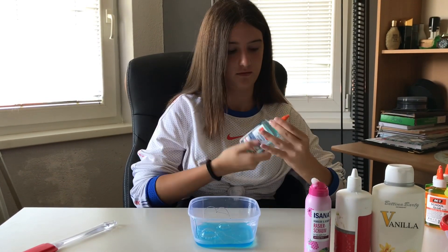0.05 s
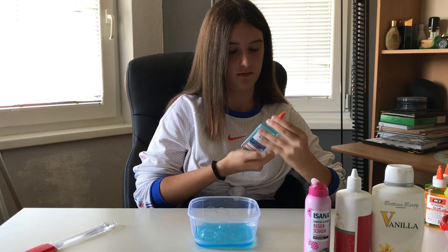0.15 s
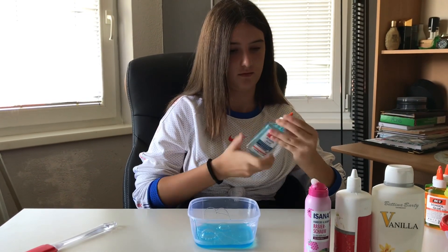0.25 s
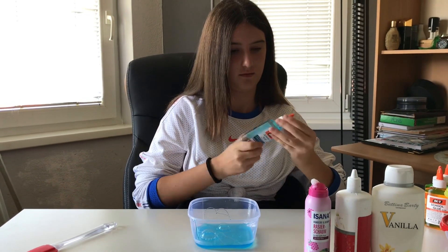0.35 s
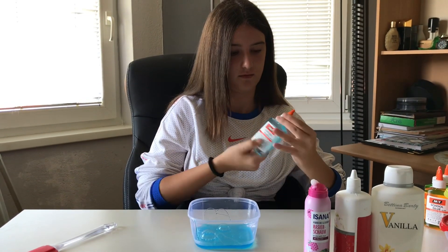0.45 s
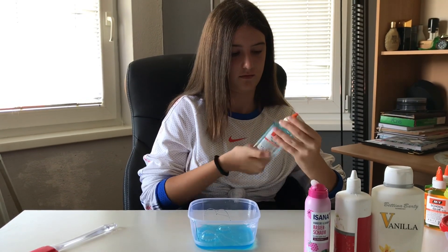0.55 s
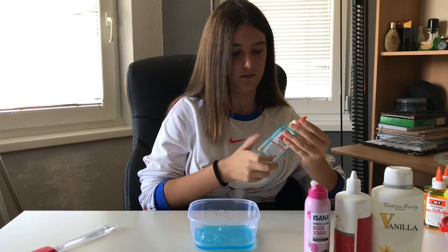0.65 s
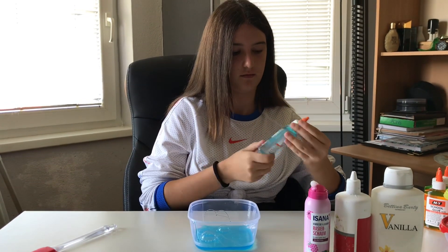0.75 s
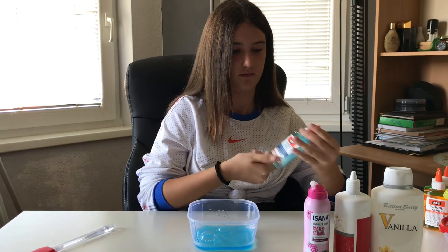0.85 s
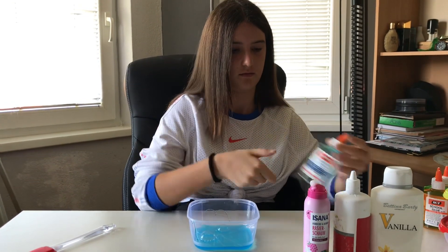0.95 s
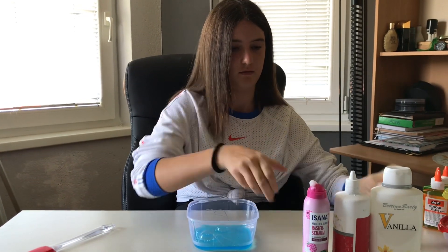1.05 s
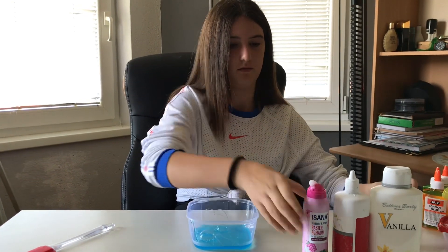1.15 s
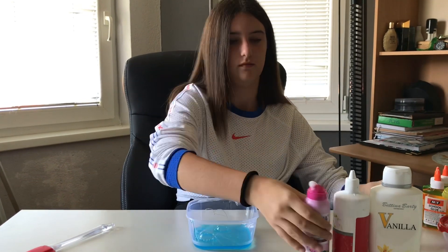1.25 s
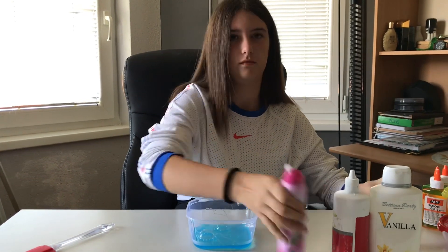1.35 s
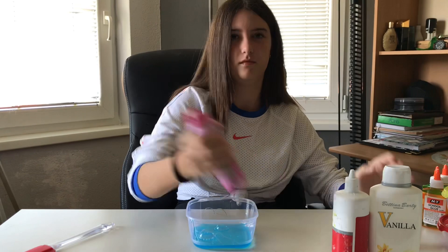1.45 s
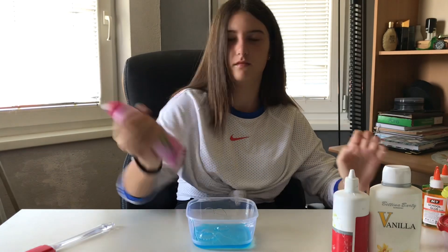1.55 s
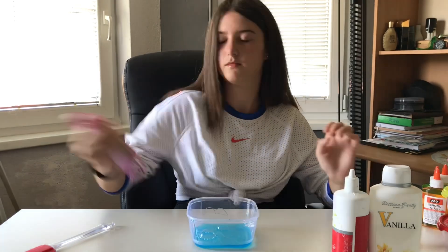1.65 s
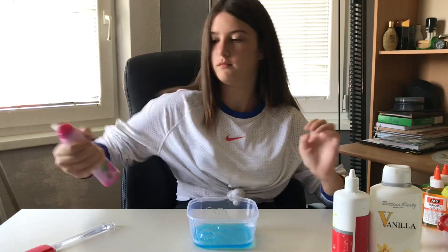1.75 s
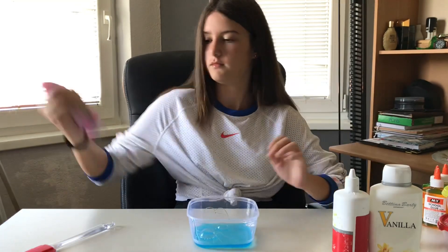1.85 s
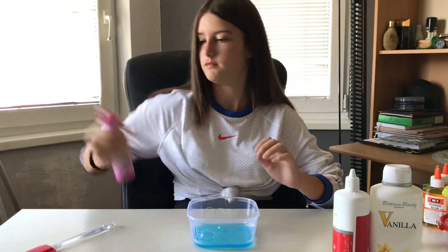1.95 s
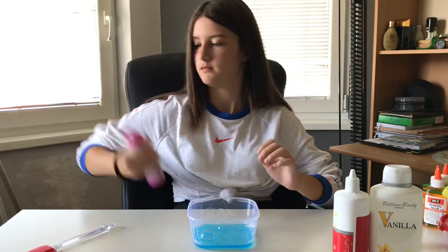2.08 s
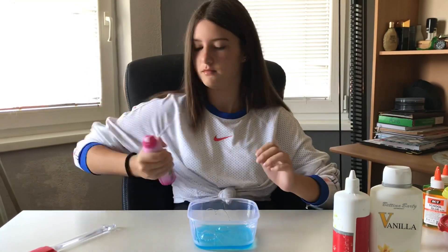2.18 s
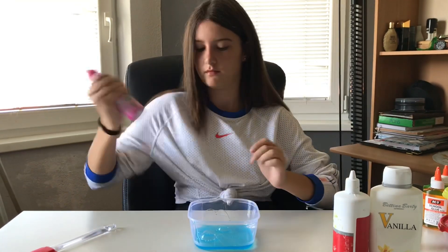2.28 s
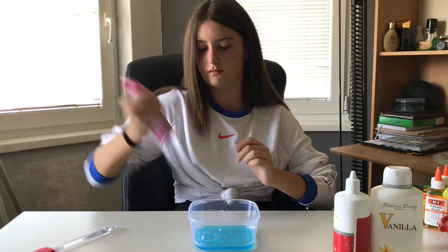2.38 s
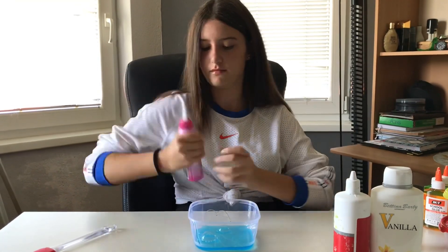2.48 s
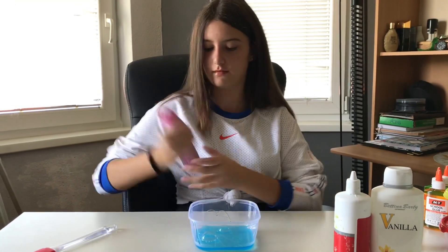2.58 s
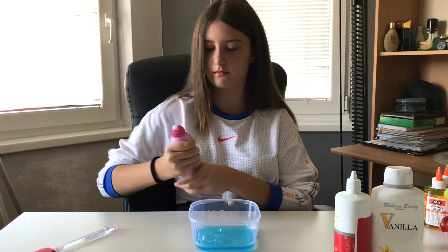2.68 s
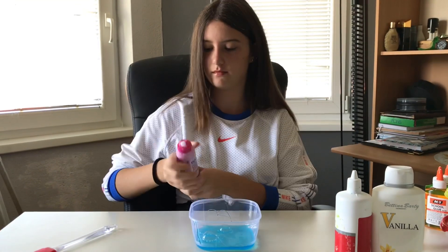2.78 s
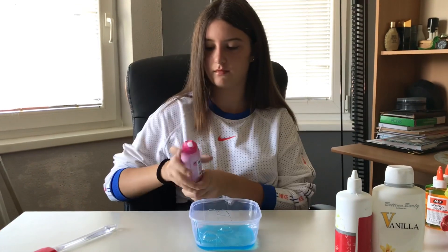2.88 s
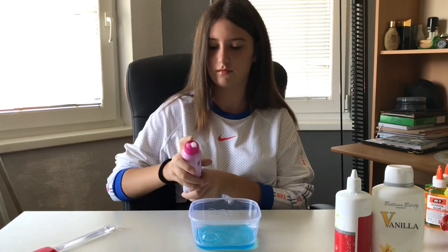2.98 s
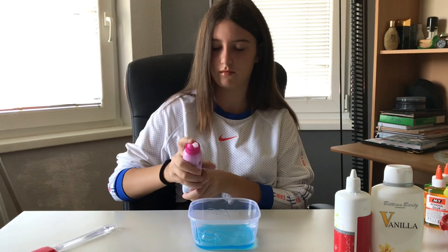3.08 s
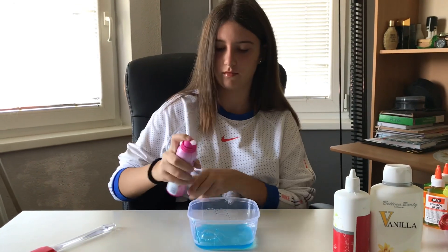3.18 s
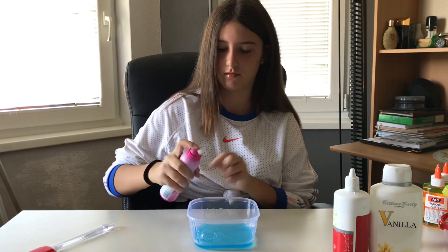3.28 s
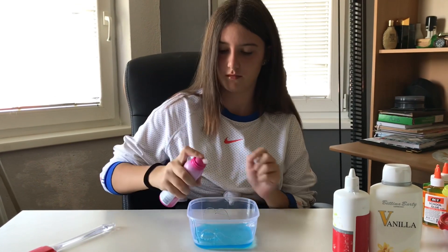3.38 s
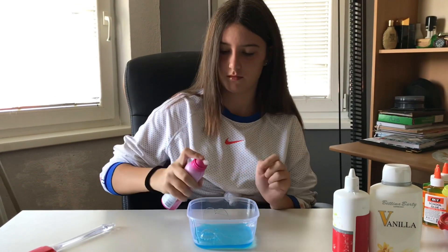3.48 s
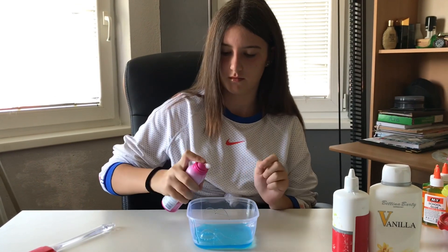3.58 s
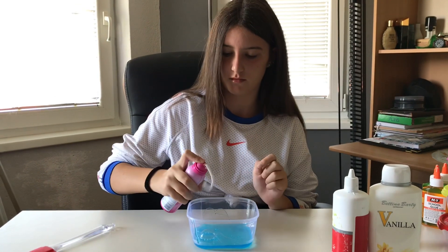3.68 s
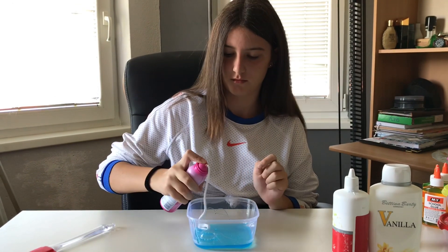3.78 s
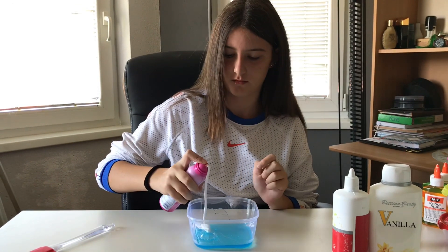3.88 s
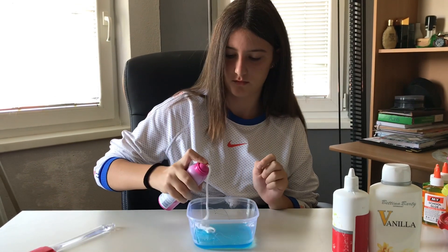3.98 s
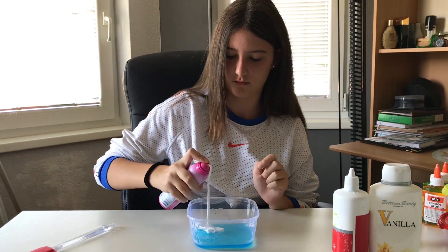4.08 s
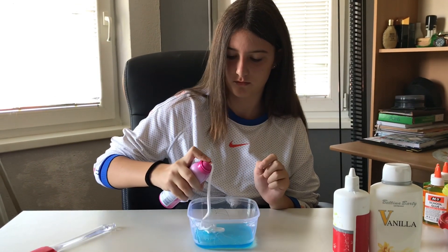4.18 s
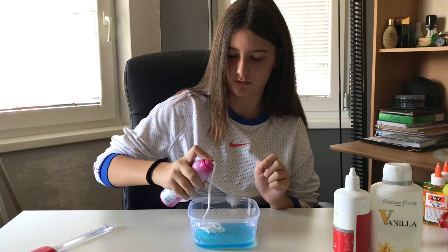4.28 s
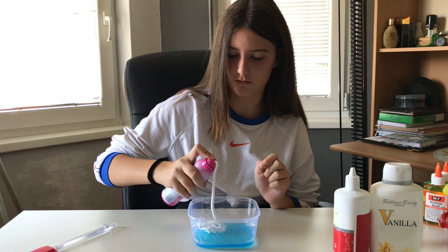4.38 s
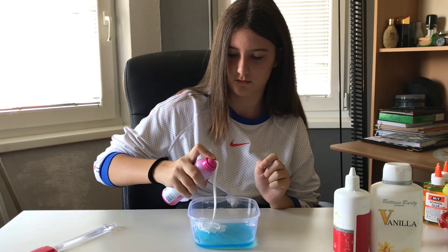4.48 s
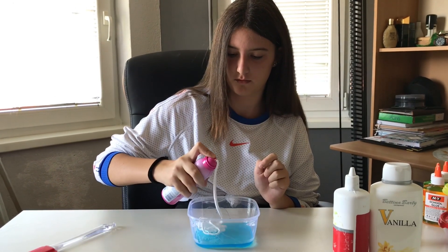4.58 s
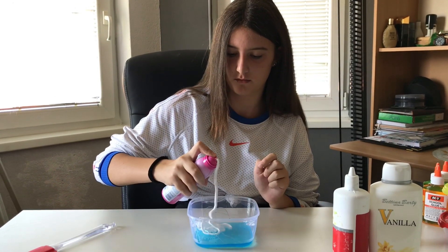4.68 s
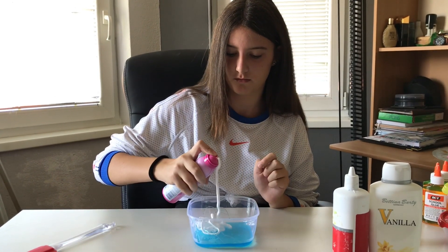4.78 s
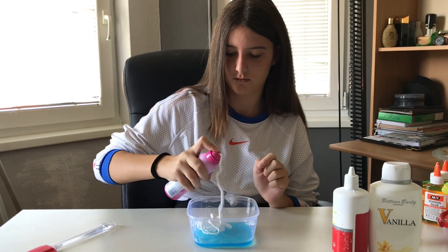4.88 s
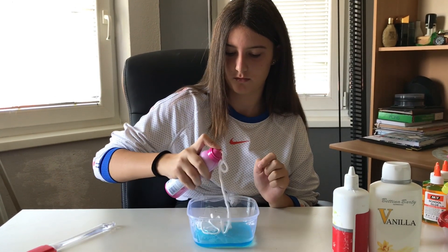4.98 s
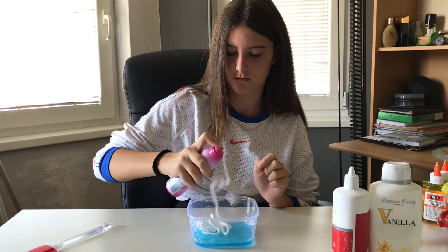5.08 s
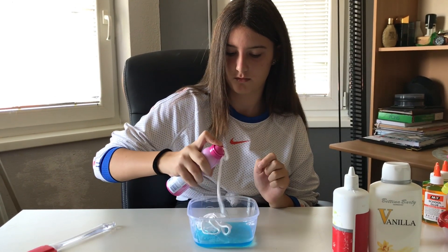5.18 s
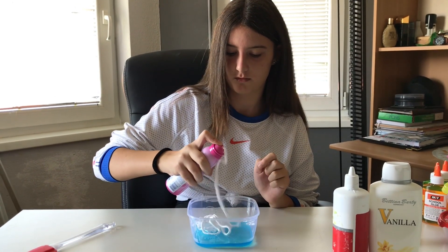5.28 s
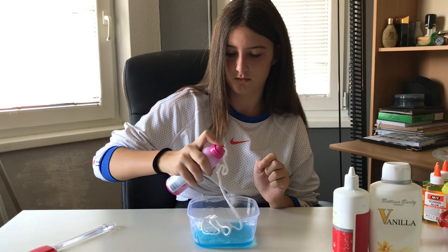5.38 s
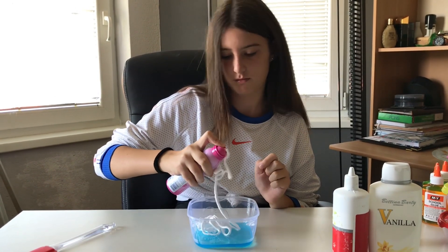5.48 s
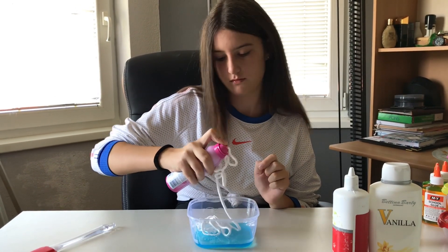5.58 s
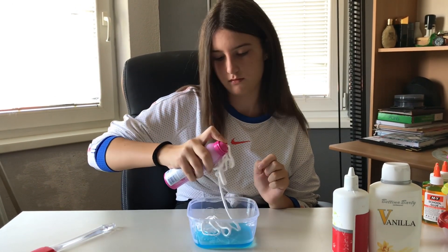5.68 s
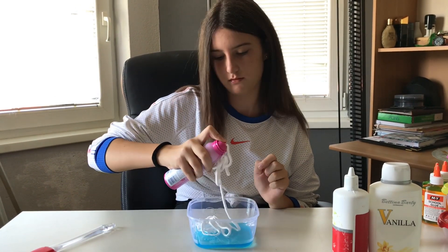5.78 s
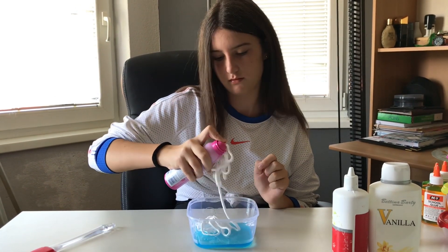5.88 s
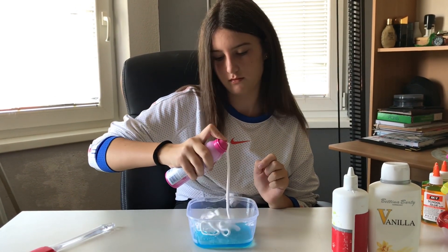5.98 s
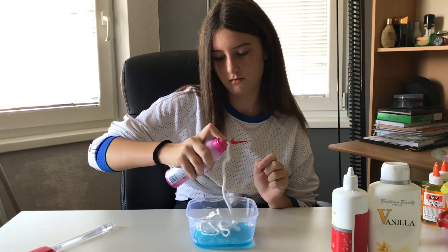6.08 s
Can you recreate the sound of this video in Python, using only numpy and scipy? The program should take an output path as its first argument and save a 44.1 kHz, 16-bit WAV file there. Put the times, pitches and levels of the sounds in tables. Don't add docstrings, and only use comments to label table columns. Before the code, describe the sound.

A plastic bottle drops and clatters on a desk, a hard knock follows, a can is shaken with liquid slaps, then foam hisses softly.

```python
import sys
import numpy as np
from scipy import signal
from scipy.fft import rfft, irfft, next_fast_len
from scipy.io import wavfile
from scipy.ndimage import uniform_filter1d

SR = 44100
rng = np.random.default_rng(int(sys.argv[2]) if len(sys.argv) > 2 else 0)


def waveform_to_disk(signal):
    frames = np.transpose(np.atleast_2d(signal))
    scaled = np.clip(frames, -1, 1) * 32767
    samples = np.round(scaled).astype(np.int16)
    wavfile.write(sys.argv[1], SR, samples)


def ratio_of_db(decibels):
    return 10 ** (np.asarray(decibels, float) / 20)


N = 270774
TIME = np.arange(N) / SR


def evened(x):
    return x / np.sqrt(np.mean(x ** 2) + 1e-20)


def read(points, hz):
    f, value = np.transpose(points)
    return np.interp(np.log(hz + 1), np.log(f + 1), value)


def add(mix, s, sound):
    part = mix[round(s * SR):][:len(sound)]
    part += sound[:len(part)]


def curve(rows, fade=0.014):
    rows = np.array(rows)
    start, end = rows[0, 0], rows[-1, 0]
    inside = np.clip(np.minimum(TIME - start + fade, end + fade - TIME) / fade, 0, 1)
    return ratio_of_db(np.interp(TIME, rows[:, 0], rows[:, 1])) * inside


def gesture(start, db, rise, hold, t60):
    t = TIME - start
    return np.clip(t / rise, 0, 1) * ratio_of_db(db - 60 * np.maximum(t - rise - hold, 0) / t60)


def swells(rows, base_db=-200):
    power = sum(ratio_of_db(2 * db) * np.exp(-((TIME - s) / length) ** 2) for s, db, length in rows)
    return np.sqrt(ratio_of_db(2 * base_db) + power)


def noise(spectrum, patchy_db, flicker_db, size=256):
    frames, hz = 4 * N // size + 8, np.fft.rfftfreq(size, 1 / SR)
    a, b, patches = rng.standard_normal((frames, len(hz), 3)).T
    patches = uniform_filter1d(patches, size // 64, 0)
    patches = evened(uniform_filter1d(patches, 8192 // size, 1))
    flicker = evened(uniform_filter1d(rng.standard_normal(frames), size=4))
    level_db = read(spectrum, hz)[:, None] + patchy_db * patches + flicker_db * flicker
    z = (a + 1j * b) * ratio_of_db(level_db)
    return evened(signal.istft(z, nperseg=size, noverlap=3 * size // 4)[1][:N])


def drone(hz, wander_hz):
    drift = uniform_filter1d(rng.standard_normal(N), size=3000)
    drift = evened(uniform_filter1d(drift, size=3000))
    return np.sqrt(2) * np.sin(2 * np.pi * np.cumsum(hz + wander_hz * drift) / SR)


def resonate(x, hz, width):
    turn = np.exp(2j * np.pi * np.cumsum(hz * np.ones(len(x))) / SR)
    r = np.exp(-np.pi * width / SR)
    return 2 * (turn * signal.lfilter([(1 - r) ** 2], [1, -2 * r, r * r], x / turn)).real


def resonances(peaks):
    size = next_fast_len(N)
    f = np.fft.rfftfreq(size, 1 / SR)
    shape = sum(ratio_of_db(db) / np.sqrt(width) / (1 + (2 * (f - hz) / width) ** 2) for hz, width, db in peaks)
    return evened(irfft(rfft(rng.standard_normal(size)) * shape, size)[:N])


def click(spectrum):
    level_db = read(spectrum, abs(np.fft.fftfreq(4096, 1 / SR)))
    log_gain = np.maximum(level_db, -90) * np.log(10) / 20
    pulse = np.fft.ifft(np.exp(np.conj(signal.hilbert(log_gain)))).real[:2048]
    return pulse / np.linalg.norm(pulse)


# pitch_hz, t60_s
REVERBERATION = [(100, 0.43), (300, 0.36), (1000, 0.35), (2500, 0.27), (6000, 0.26), (15000, 0.17)]


def room(wet_db, lively=0.97, size=SR // 3, first=0.005):
    taps = np.zeros(size)
    at = np.arange(60, size - 20, 20)
    build_up = 1 - np.exp(-at / SR / 0.0035)
    taps[at + rng.integers(0, 20, len(at))] = rng.choice([-1., 1.], len(at)) * build_up
    hz, t, z = signal.stft(taps, SR, nperseg=256)
    decay = ratio_of_db(-60 * t / (lively * read(REVERBERATION, hz)[:, None]))
    tail = signal.istft(z * decay, SR, nperseg=256)[1]
    tail *= ratio_of_db(wet_db) / np.linalg.norm(tail)
    tail[0] += 1
    tail[round(first * SR)] += .4
    return tail


# pitch_hz, density_db (per Hz)
TONE_COLOUR = [(18, -47), (30, -17), (100, -3.5), (343, -7.5), (434, -6), (752, -14.5), (1090, -14.5),
               (4020, -24), (5800, -23.5), (7540, -29.5), (8370, -26.5), (14100, -29.5), (15700, -33.5)]
# middle_s, level_db, length_s
HUM_SWELLS = [(.07, -66, .07), (.48, -76, .1), (.68, -72, 0.063), (.9, -74, .08), (1.37, -67, 0.051),
              (1.87, -72, 0.043), (2.09, -66, 0.08), (2.37, -65.5, 0.078), (2.79, -69.5, 0.042),
              (3.26, -68, 0.048), (3.66, -71, 0.061), (3.86, -66, 0.048), (4.38, -73.5, .08),
              (4.75, -67, .06), (5.53, -65, 0.075), (5.77, -63.5, 0.064), (5.98, -59.5, 0.056),
              (6.08, -66.5, 0.046)]
# start_s, level_db, rise_s, hold_s, t60_s
WHINE_RUNS = [
    (-.05, -71.5, .05, 1.13, .3),
    (3.93, -70.5, 0.07, .06, .3),
]


def room_tone():
    hum = drone(96, 4.8) * swells(HUM_SWELLS, base_db=-78)
    whine = drone(247, 2.8) * sum(gesture(*row) for row in WHINE_RUNS)
    return ratio_of_db(-66) * noise(TONE_COLOUR, 1.73, 0.29, size=1024) + hum + whine


# middle_s, level_db, length_s
RUBS = [(.02, -75, .04), (.12, -71, 0.05), (.19, -67, 0.016), (.545, -68, 0.034), (.8, -77, 0.025),
        (1.04, -66.5, 0.035), (1.48, -69.5, 0.036), (1.57, -61.5, .04), (1.66, -67, 0.031),
        (1.8, -58, 0.065), (2.78, -66.5, 0.081), (2.9, -69, 0.034), (3.05, -66.5, 0.11),
        (3.24, -66.5, 0.055), (3.34, -76.5, 0.081), (4.033, -78.5, 0.039)]
# pitch_hz, density_db (per Hz)
CLOTH_COLOUR = [(470, -34), (800, 1.5), (1450, 3), (2040, -7.5), (2140, 1.5), (3110, -4), (8110, -3.5),
                (15700, -7.5)]


def rustle():
    return noise(CLOTH_COLOUR, 1.0, 0.97) * swells(RUBS)


# start_s, level_db, rise_s, hold_s, t60_s
DESK_ROCKING = [
    (0.904, -63.5, 0.3, .03, .2),
    (1.72, -51.5, 0.054, 0.036, 2.1),
    (2.3, -77.5, .2, 0.29, .5),
]
# start_s, level_db, rise_s, hold_s, t60_s
DESK_THUD = (5.5, -65, 0.5, -0.1, 1)


def desk():
    panel = resonances([(350.4, 37, 4.0), (421.0, 25, 2.5), (500.0, 35, 0), (571, 27, -1.5), (214.6, 20, -2.5)])
    cavity = resonances([(75.4, 25, -5), (141, 35, 5)])
    rocking = panel * sum(gesture(*row) for row in DESK_ROCKING)
    return rocking + cavity * gesture(*DESK_THUD) * ratio_of_db(-3)


# start_s, peak_db, pitch_hz, body_db (re peak), body_hz
LIGHT_TICKS = [(0.0718, -52.5, 6500, 6.5, 1640), (0.2453, -65, 5380, 3, 800), (0.2804, -63, 6000, -22, 404),
               (0.369, -69, 5270, 5, 1100), (0.4125, -60.5, 5700, -7, 900), (0.53, -66.5, 5770, 9, 1860),
               (0.793, -60.5, 5800, -4, 520), (1.3285, -54, 10500, -8.5, 6000),
               (1.329, -56, 14000, -20, 2400), (1.6685, -54, 5800, -7, 9000), (.755, -66, 5300, -8, 600),
               (3.5603, -65, 10200, -23, 612), (3.6381, -48.5, 5850, -9.5, 401),
               (3.6617, -51, 13500, -16, 406), (3.8416, -65, 7100, -16, 522), (4.011, -66, 8200, -22, 570),
               (4.1428, -59, 13700, -3, 2220), (4.181, -63, 7400, -15.5, 2430),
               (5.3897, -59, 8100, -27, 431), (5.5548, -51, 7200, -17.5, 460),
               (5.6096, -59, 7860, -6, 1984), (6.024, -59, 6500, -5, 4700), (6.04, -71, 6000, 9, 1250)]
# start_s, peak_db, pitch_hz, body_db (re peak), body_hz
ROOMIER_TICKS = [
    (.072, -51, 3300, 1, 1860),
    (.44, -69.5, 5600, 8.5, 1800),
    (.96, -66, 5640, -4, 600),
    (4.0805, -48.5, 8000, -9, 2400),
    (4.078, -59.5, 3000, 5, 1350),
    (4.086, -62.5, 5000, 7, 470),
    (4.76, -58, 8400, -20, 2200),
    (5.14, -63, 7500, -4, 1410),
]


def ticks():
    out, t = np.zeros(N), np.arange(1500) / SR
    for k, (s, db, hz, body_db, body_hz) in enumerate(LIGHT_TICKS + ROOMIER_TICKS):
        wet_db = -4 if k < len(LIGHT_TICKS) else -0.5
        a, b = rng.standard_normal((2, len(t)))
        snap = evened(resonate(a, hz, 3200) + 0.11 * a) * np.exp(-t / 0.0024)
        body = evened(resonate(b, body_hz, 0.54 * body_hz + 200)) * np.exp(-t / 0.0084)
        knock = snap + ratio_of_db(body_db - 3.0) * body
        add(out, s, ratio_of_db(db + 1.5) * signal.fftconvolve(knock, room(wet_db, 0.76, size=SR // 6)))
    return out


# start_s, peak_db
DESK_BLOWS = [
    (1.183, -18),
    (1.3336, -24),
    (1.370, -38),
    (1.4589, -37),
    (1.5404, -37.5),
    (1.606, -38),
    (1.671, -39),
    (1.6885, -6),
]
STRUCK_OBJECT = [0, 1, 2, 2, 2, 2, 2, 3]
# pitch_hz, density_db (per Hz)
CRACK_COLOURS = [
    [(35, -77), (60, -52), (181, -13), (276, -27), (310, -7), (357, -7), (460, -5), (642, -14),
     (892, -16.5), (1210, -34), (1940, -18), (2450, -28), (3900, -36), (5600, -33), (11000, -40),
     (14900, -53), (16400, -66)],
    [(35, -56), (60, -29), (96, -17.5), (177, -23.5), (218, -12), (300, -23.5), (402, -1.5), (452, -15.5),
     (520, 3), (642, -9.5), (1330, -10), (1800, -24), (3320, -42), (10200, -62), (16400, -62)],
    [(59, -47), (100, -19.5), (260, -21.5), (380, 2.5), (621, -16), (768, -7), (1230, -31), (2000, -19),
     (3780, -29.5), (7450, -39), (8280, -45.5), (16000, -52.5)],
    [(29, -46), (50, -24.5), (152, -26), (199, -14), (254, -24.5), (360, -8), (500, -4.5), (737, -21),
     (811, -20), (1000, -18), (1600, 0), (2500, -15), (3500, -32), (6210, -22.5), (13800, -35.5),
     (16400, -56)],
]
# pitch_hz, level_db, t60_s
MODES = [
    [(196.8, -13.5, 0.29), (318, -14, 0.25), (373, -4, .12), (431, -4, 0.49), (493, -5, .22),
     (630, -10, .15), (568, -3, 0.25), (742, 3, 0.12), (863, 3, 0.08), (1513, 0, 0.058), (1880, -10.5, 0.3),
     (2200, -7, 0.068), (2790, -10, 0.13), (5614, -3, 0.038), (6450, -19, .025), (4940, -22, .12),
     (7200, -24, .02)],
    [(216.5, -15.5, 0.41), (397.3, -12, 0.25), (358, -11, .15), (543.7, 6, 0.11), (600, -6, 0.18),
     (809, -15.5, 0.15), (923, -6, 0.15), (1090, -6, .08), (1250, -3, 0.07), (1550, -9, 0.05),
     (2350, -11.5, 0.065)],
    [(345, 3, 0.22), (426, 0, 0.12), (699, -8.5, 0.15), (900, -6, 0.11), (550, -12, 0.15),
     (2100, -20, .015), (4400, -26, .012)],
    [(206, -21, 0.69), (390.3, -14, .25), (440, -9.5, 0.27), (497, -2, 0.3), (576.6, -3, 0.28),
     (712, -10, 0.35), (938, -11, .25), (1312, -7.5, .25), (1422, -11.5, .2), (1732, 21.5, 0.013),
     (2283, 10, 0.0166), (1533, -8, 0.3), (1610, -5, .33), (1780, -9, .28), (2550, -20, 0.11),
     (5020, -19, 0.1), (6335, -13, 0.066)],
]
CORNER = [0.94, .75, 0.67, .9]
# ring_share, snap_db, room_db, contact_s, ring_swell_s, wall_echo_s, ring_room_db
OBJECT_ANSWER = [
    (.7, -15, 1.5, 0.0016, 0.0011, .0068, -11),
    (.7, -40, 3, 0.001, 0.0013, 0.0041, -8.5),
    (.9, -40.5, 0.5, .001, 0.0028, .0046, -11.5),
    (1.6, -14, 1.5, 0.00092, 0.00065, .0048, -11),
]


def blows():
    out, t = np.zeros(N), np.arange(SR // 2) / SR
    for (s, db), k in zip(DESK_BLOWS, STRUCK_OBJECT):
        share, snap_db, wet_db, contact, swell, echo, ring_wet_db = OBJECT_ANSWER[k]
        ring = sum(ratio_of_db(level - 60 * t / (t60 * CORNER[k])) * np.sin(2 * np.pi * hz * t)
                   for hz, level, t60 in MODES[k])
        ring *= 1 - np.exp(-(t / swell) ** 2)
        scrape, snap = rng.standard_normal((2, 600))
        touch = 0.27 * np.exp(-((t[:600] - .0005) / .00005) ** 2)
        uneven_contact = 0.34 * scrape * t[:600] / contact * np.exp(-t[:600] / contact)
        scrape = signal.fftconvolve(click(CRACK_COLOURS[k]), uneven_contact + touch)
        crack = signal.fftconvolve(scrape, room(wet_db, CORNER[k], size=SR // 2, first=echo))[:len(t)]
        ring = signal.fftconvolve(ring, room(ring_wet_db, first=echo))[:len(t)]
        snap = np.diff(snap) * np.exp(-t[:599] / 0.0035)
        snap = signal.fftconvolve(snap, room(-5.0, first=echo))
        both = crack / abs(crack).max() + share * ring / abs(ring).max()
        add(both, 0, ratio_of_db(snap_db) * snap / abs(snap).max())
        add(out, s, ratio_of_db(db) * both / abs(both).max())
    return out


# start_s, peak_db, wall_ring_db (re peak), landing_hz
THROWS = [(1.8482, -46, -14, 3100), (1.8622, -56, -1, 3080), (1.934, -49, -20, 2290),
          (1.9979, -47, -31, 2850), (2.086, -49.5, -26, 3290), (2.135, -49.5, -6, 3280),
          (2.1592, -45, -4, 2870), (2.182, -59, 2, 2873), (2.2294, -50, -15, 2850), (2.2568, -60, 2, 3040),
          (2.290, -45, -17, 3070), (2.311, -55, -5.5, 3120), (2.3624, -48, -5, 2930), (2.374, -57, 0, 2030),
          (2.437, -47.5, -5, 2840), (2.509, -48, -6.5, 2400), (2.567, -45, -20, 2820),
          (2.5766, -57, -7, 2900), (2.637, -48.5, -5, 2650), (2.721, -52.5, -10, 2580)]
# pitch_hz, density_db (per Hz)
SPLASH_COLOUR = [(350, -26), (600, 5.5), (651, -12), (916, -0.5), (1020, -7), (2930, -3.5), (3740, -7),
                 (7930, -4.5), (14300, -12), (15700, -10)]
# pitch_hz, width_hz, level_db
CAN_WALL = [(2060, 560, -5), (2700, 590, -2), (2950, 270, -1), (3300, 400, -6)]
# start_s, level_db, rise_s, hold_s, t60_s
CHURNING = (1.76, -60.5, 0.01, 0.77, 0.6)


def shaking():
    splash, wall, spot = np.zeros((3, N))
    t = np.arange(SR // 3) / SR
    hold_s = 0.013
    for s, db, ring_db, hz in THROWS:
        since = s - THROWS[0][0]
        rise, t60 = .005 * np.exp(-since / .4), 0.34 * np.exp(-since / 2.8)
        shape = (1 - np.exp(-t / rise)) * ratio_of_db(db - 5.5 - 60 * np.maximum(t - hold_s, 0) / t60)
        add(splash, s, shape ** 2)
        add(wall, s, (ratio_of_db(ring_db - 0.5) * shape) ** 2)
        landing = evened(resonate(rng.standard_normal(len(t)), hz, 300))
        add(spot, s, ratio_of_db(ring_db + 3.0 - 60 * t / 0.15) * shape * landing)
    liquid = np.sqrt(splash + gesture(*CHURNING) ** 2) * noise(SPLASH_COLOUR, 1.7, 1.1)
    return liquid + np.sqrt(wall) * resonances(CAN_WALL) + spot


# start_s, level_db, rise_s, hold_s, t60_s
SPURT_STAGES = [
    (3.55, -74, .012, 0.019, 0.11),
    (3.576, -56, .012, 0.0056, 0.22),
    (3.585, -59, 0.018, 0.11, 0.43),
    (3.78, -77.5, 0.061, .25, .2),
]
# pitch_hz, density_db (per Hz)
GAS_COLOUR = [(290, -37), (500, -14), (916, 4.5), (985, -18), (1190, 4.5), (1700, -10), (2240, -3.5),
              (4350, -11), (14200, -10), (15700, -7.5)]
# pitch_hz, width_hz, level_db
VALVE_PASSAGES = [(2280, 500, -9), (5500, 900, -3), (8500, 800, -0.5), (10000, 1100, -3),
                  (14000, 1900, 5.5)]
# time_s, edge_hz
FOAM_FILLING = [
    (3.595, 8500),
    (3.62, 3500),
    (3.67, 2490),
    (3.7, 790),
    (3.76, 1300),
    (3.82, 5000),
]


def spurt():
    gas = noise(GAS_COLOUR, 2.0, 1.3) + ratio_of_db(-2.5) * resonances(VALVE_PASSAGES)
    hz, t, z = signal.stft(gas, SR, nperseg=256)
    edge_hz = np.interp(t, *np.transpose(FOAM_FILLING))
    z /= np.sqrt(1 + (edge_hz / (hz[:, None] + 1)) ** 4)
    flow = np.sqrt(sum(gesture(*row) ** 2 for row in SPURT_STAGES))
    return signal.istft(z, SR, nperseg=256)[1][:N] * ratio_of_db(1.5) * flow


# start_s, peak_db, pitch_hz
BUBBLE_POPS = [(3.587, -50, 13500), (3.594, -46, 14000), (3.606, -43, 13500), (3.622, -50, 13500),
               (3.684, -46, 8500), (3.716, -52, 9000), (3.739, -52, 11000), (3.761, -50, 9500),
               (3.815, -57, 13500), (3.831, -57, 12500), (4.192, -56, 9000), (4.205, -55, 5500),
               (4.223, -58, 6000), (4.431, -51, 6500), (4.553, -52, 7900), (4.689, -50, 8000),
               (5.135, -50, 7500), (5.172, -54, 8000), (5.24, -51, 6500), (5.30, -53, 6500),
               (5.45, -51, 7500), (5.484, -54, 8000), (5.555, -46, 7200), (5.57, -53, 6800),
               (5.679, -52, 7500), (5.725, -51, 7000), (5.755, -52, 5000), (5.789, -55, 7500),
               (5.831, -52, 8000), (5.953, -51, 7000), (5.983, -53, 8200), (6.12, -54, 11000)]


def pops():
    out, t = np.zeros(N), np.arange(300) / SR
    peak_s = .0009
    shape = t / peak_s * np.exp(1 - t / peak_s) / 2
    for (s, db, hz), grain in zip(BUBBLE_POPS, rng.standard_normal((len(BUBBLE_POPS), len(t)))):
        add(out, s, ratio_of_db(db - 2.5) * evened(resonate(grain, hz, .6 * hz)) * shape)
    return out


# time_s, flow_db
SPRAY_FLOW = [(4.12, -63.5), (4.16, -70), (4.2, -61), (4.58, -58), (4.87, -63.5), (5.1, -61), (5.32, -64.5),
              (5.93, -60), (6.14, -60.5)]
# pitch_hz, density_db (per Hz)
JET_COLOUR = [(350, -45), (600, -18), (1660, -6), (2370, 0), (2720, -4), (4370, -14.5), (4810, -4.5),
              (7240, -7), (7850, -7.5), (9370, -8), (10700, -7), (11500, -7.5), (15500, -4)]
# pitch_hz, width_hz, level_db
SPOUT_PIPE = [(4800, 300, -7), (5520, 350, 0.5), (6550, 240, -2), (6880, 180, -9), (8000, 350, 3.5),
              (8500, 180, -3), (8950, 130, -6), (12800, 900, 3.5), (14300, 1800, 4.5)]
# pitch_hz, width_hz, level_db
NOZZLE_HOLLOW = [(1800, 37, 1.5), (2280, 270, 7.5), (2430, 100, 6), (2960, 1300, 8)]
# start_s, level_db, rise_s, hold_s, t60_s
NOZZLE_HOLDING = (4.13, -62, 1, 0.3, .3)
# time_s, pitch_hz
WHISTLE_PITCH = [(3.62, 10700), (4.3, 10500), (5.01, 10430), (5.04, 10750), (5.85, 10720), (6.14, 10700)]
# start_s, level_db, rise_s, hold_s, t60_s
VALVE_LEAK = [
    (3.68, -68, .07, .02, .3),
    (3.9, -78.5, .15, .05, .3),
    (4.075, -69, .005, .05, .2),
]


def spray():
    jet = noise(JET_COLOUR, 1.1, .7, size=512)
    jet = jet + ratio_of_db(-4.0) * resonances(SPOUT_PIPE)
    jet = evened(jet + 0.061 * np.roll(jet, 131) + 0.86 * np.roll(uniform_filter1d(jet, size=5), 310))
    burst = (rng.random(N) < 150 / SR) * ratio_of_db(2.7 * np.minimum(rng.exponential(1, N), 3))
    t = np.arange(200) / SR
    fizz = signal.oaconvolve(burst, np.sin(2 * np.pi * 7000 * t) * np.exp(-t / 0.00013))[:N]
    whistle_hz = np.interp(TIME, *np.transpose(WHISTLE_PITCH))
    whistle = evened(resonate(rng.standard_normal(N), whistle_hz, 380))
    whistle = whistle * ratio_of_db(1.6 * evened(uniform_filter1d(rng.standard_normal(N), size=1500)))
    flow = curve(SPRAY_FLOW)
    hiss = flow * (jet + 0.94 * fizz + whistle * ratio_of_db(-10))
    hollow = resonances(NOZZLE_HOLLOW) * ratio_of_db(-10) * np.maximum(flow, gesture(*NOZZLE_HOLDING))
    leak = whistle * ratio_of_db(-3.0) * sum(gesture(*row) for row in VALVE_LEAK)
    return hiss + hollow + leak


def scene():
    background = room_tone() + rustle() + desk()
    return (background + ticks() + blows() + shaking() + spurt() + pops() + spray())[None]


def roll_off(x):
    return signal.sosfilt(signal.butter(12, 16530, fs=SR, output="sos"), x)


def record(dry):
    x = signal.sosfilt(signal.butter(4, 48, "high", fs=SR, output="sos"), dry)
    lowpass = signal.firwin(1601, 15740, window=("kaiser", 9), fs=SR)
    low = signal.oaconvolve(x, lowpass[None], "same")
    attack = uniform_filter1d(abs(x), 300) > .03
    mix = low + .3 * (x - low) * uniform_filter1d(attack * 1., size=200)
    return roll_off(mix)


dry = scene()
out = record(dry)
waveform_to_disk(out)
```